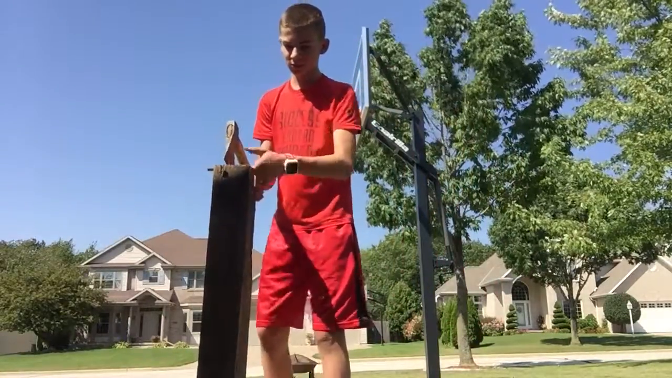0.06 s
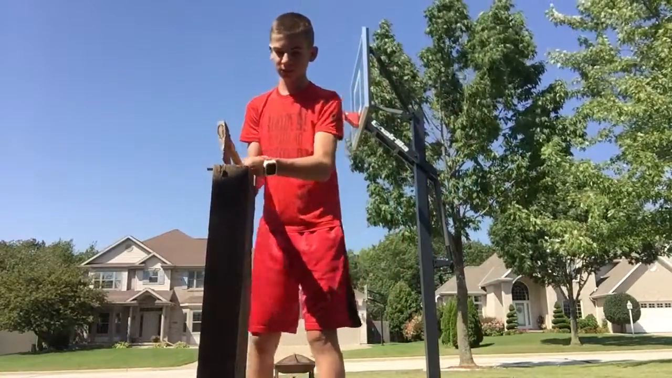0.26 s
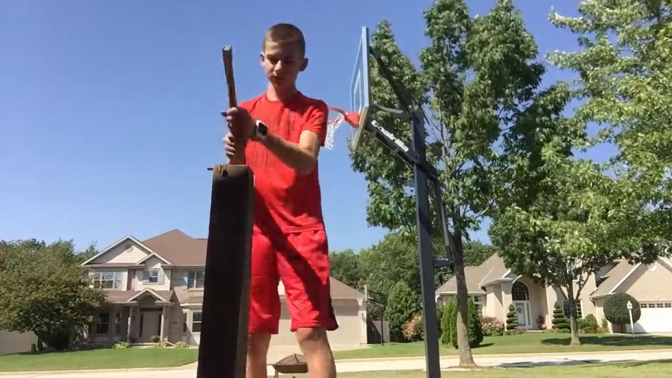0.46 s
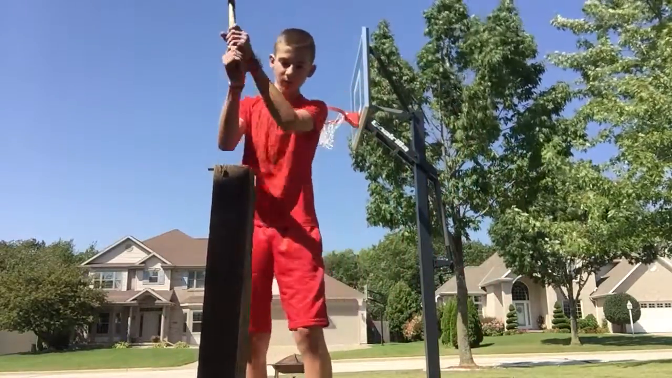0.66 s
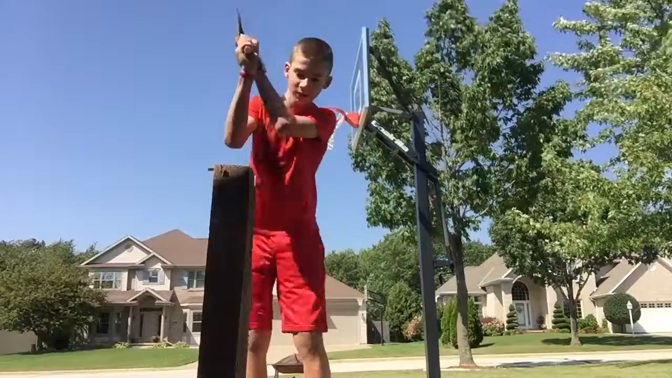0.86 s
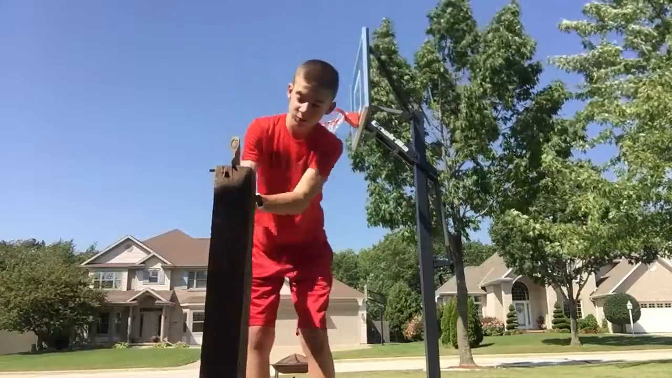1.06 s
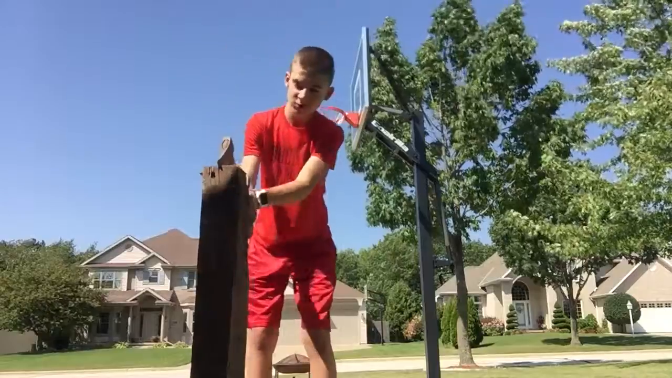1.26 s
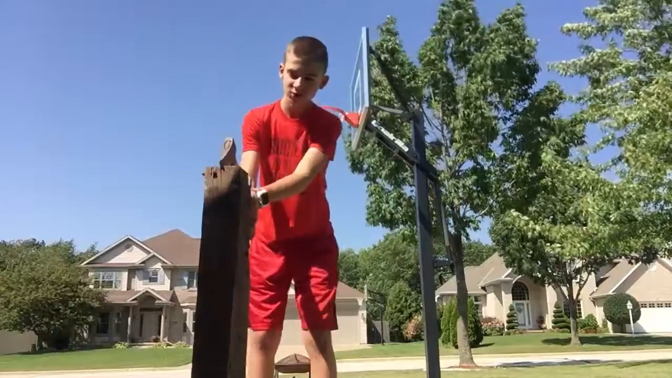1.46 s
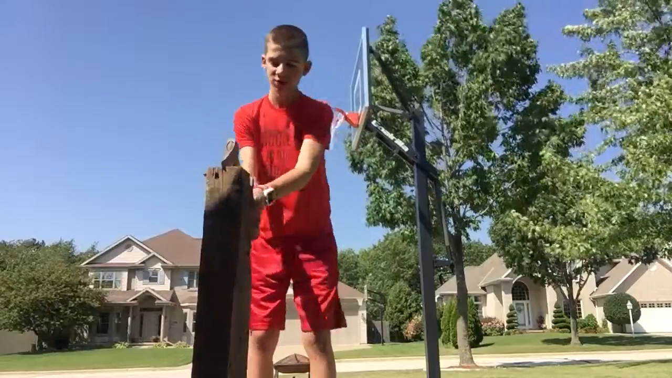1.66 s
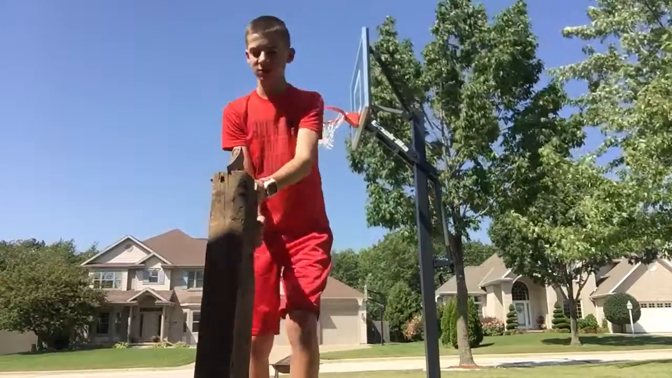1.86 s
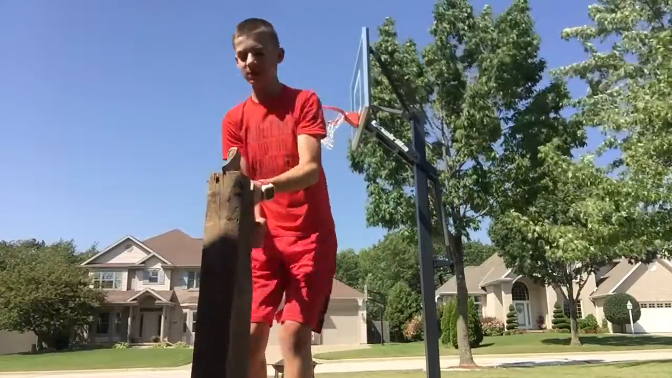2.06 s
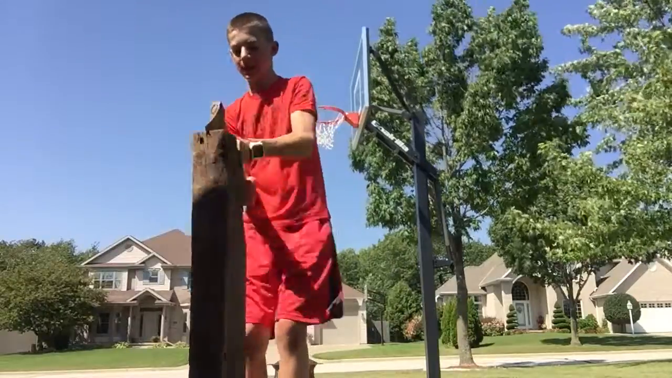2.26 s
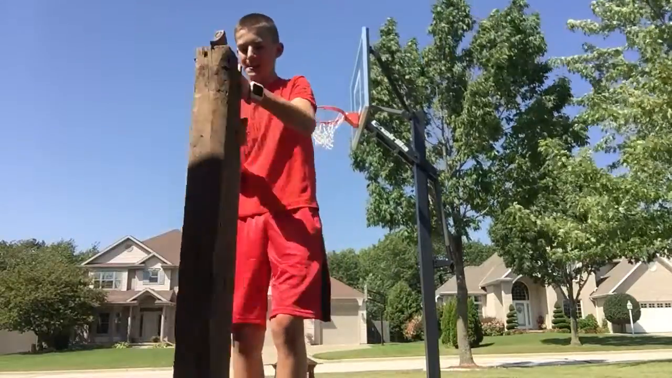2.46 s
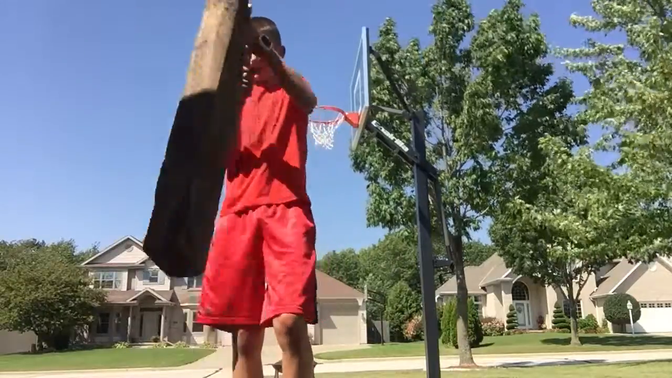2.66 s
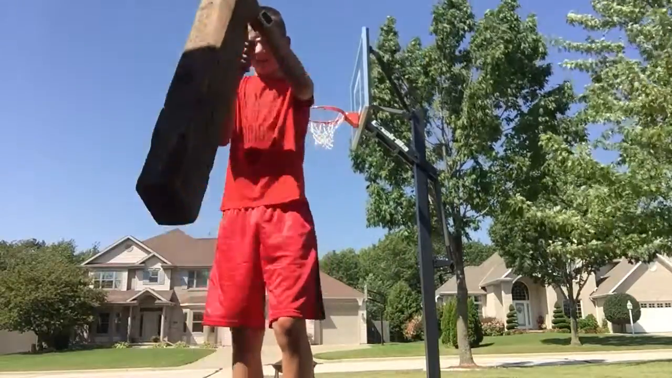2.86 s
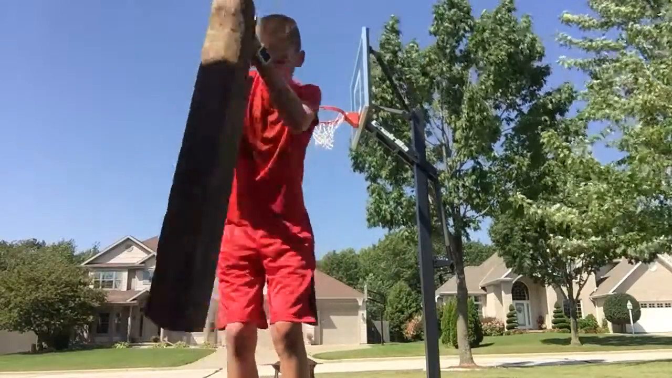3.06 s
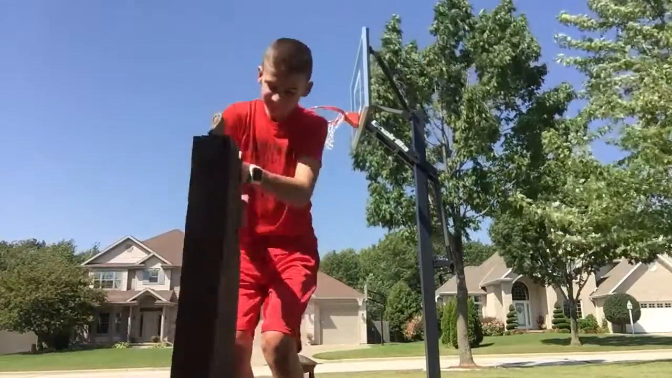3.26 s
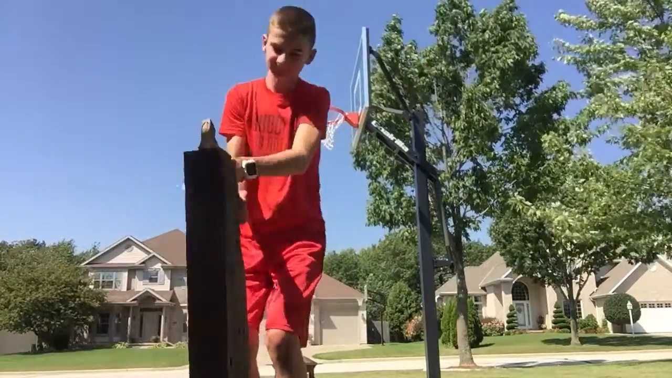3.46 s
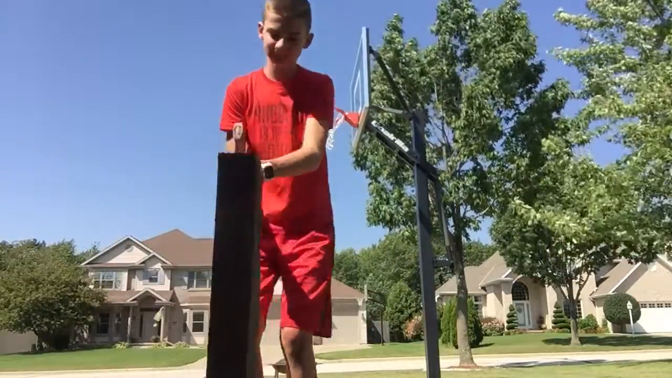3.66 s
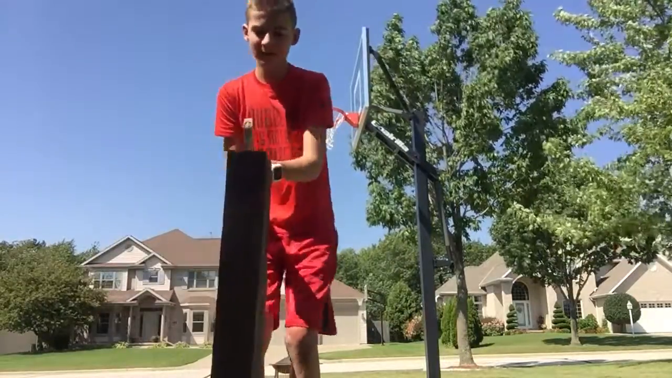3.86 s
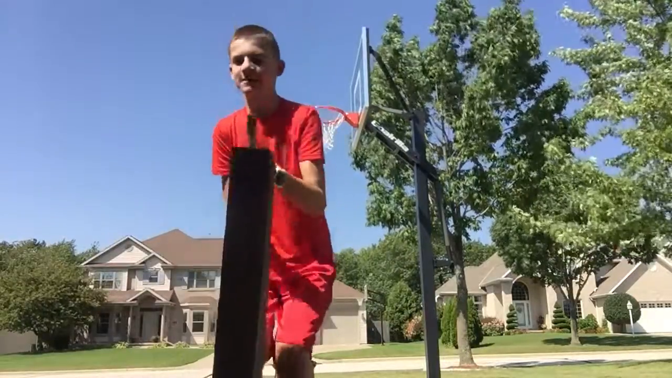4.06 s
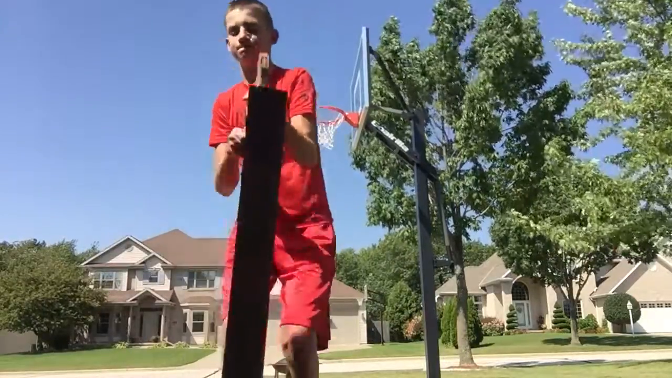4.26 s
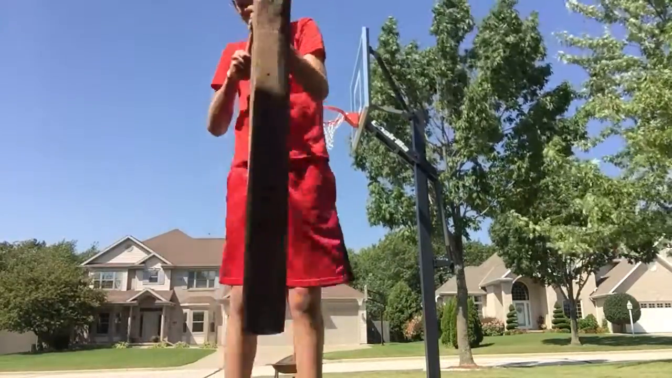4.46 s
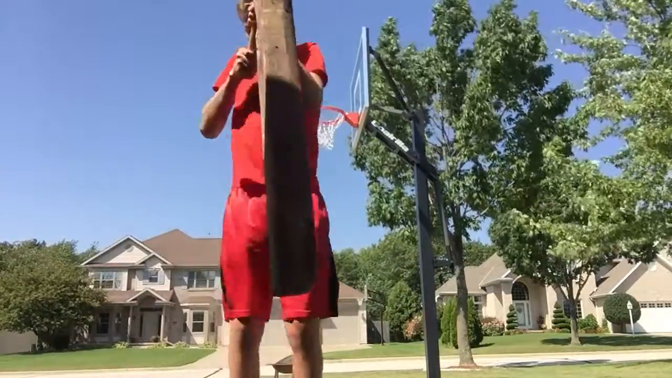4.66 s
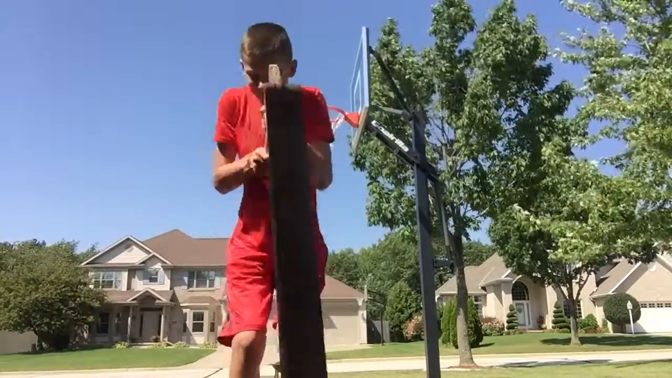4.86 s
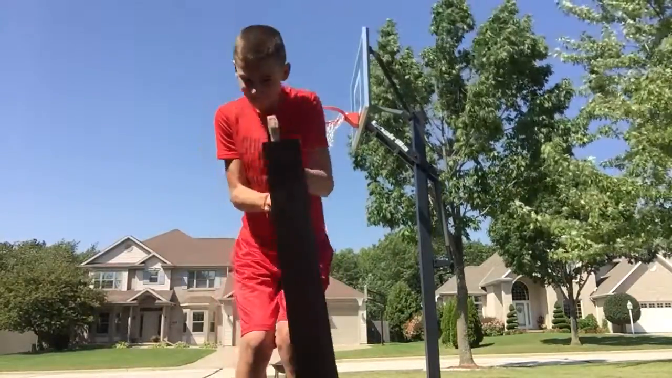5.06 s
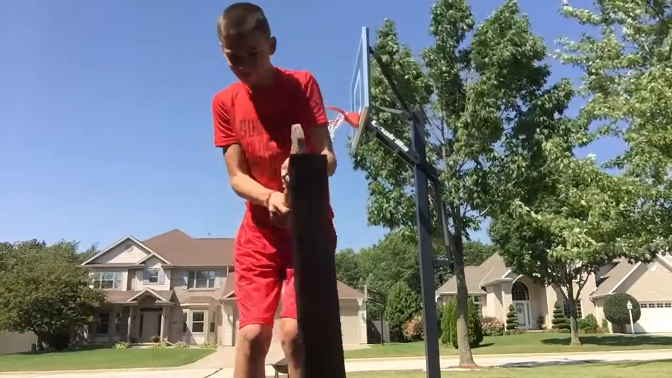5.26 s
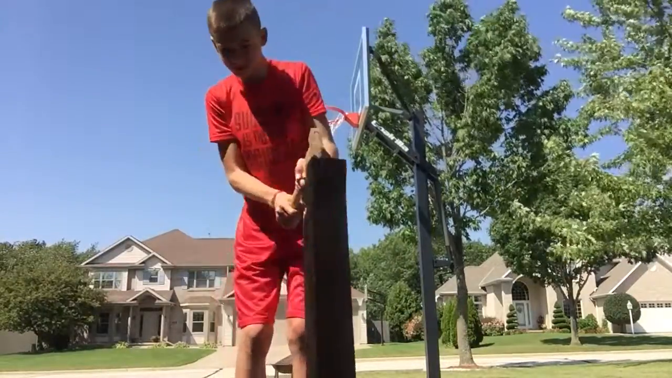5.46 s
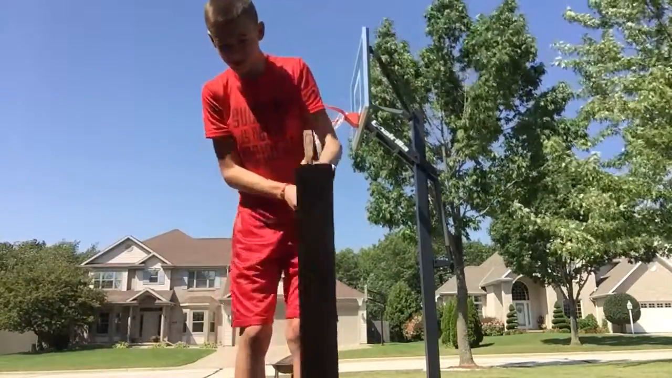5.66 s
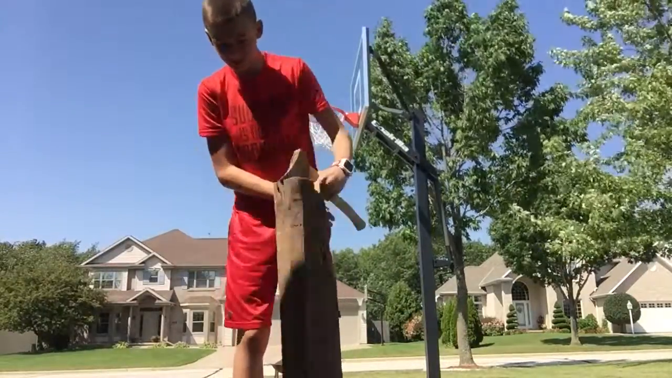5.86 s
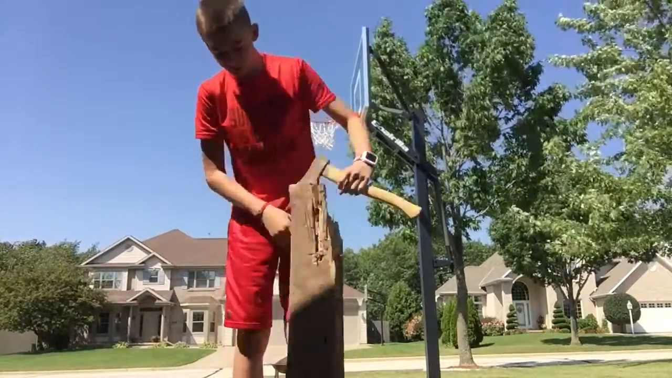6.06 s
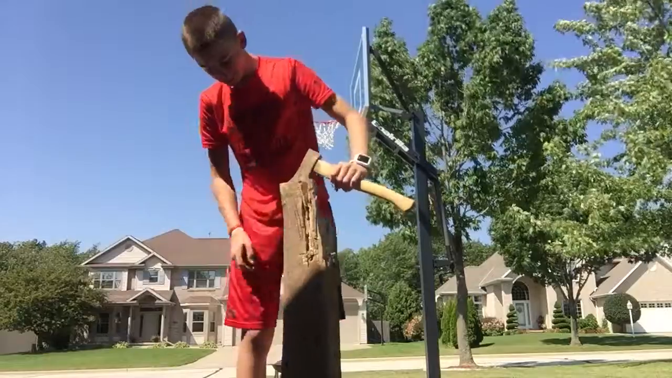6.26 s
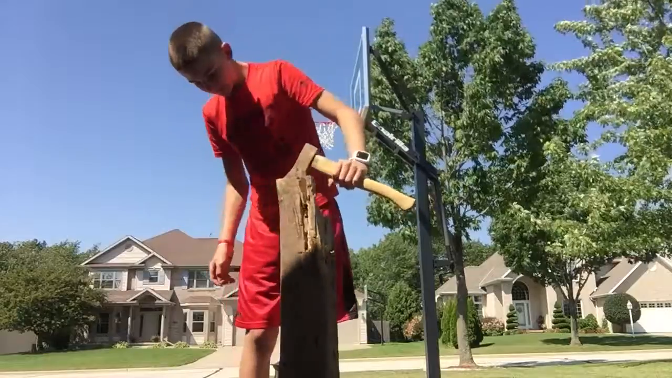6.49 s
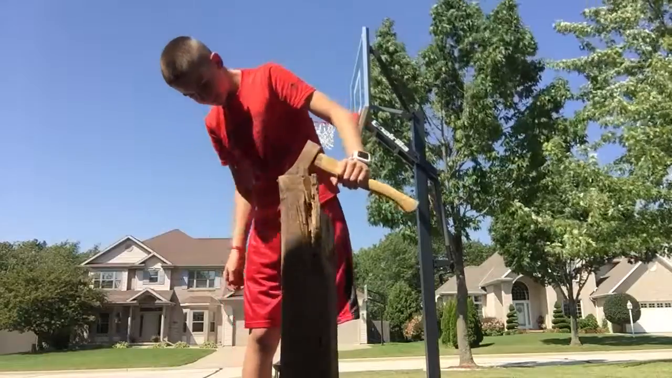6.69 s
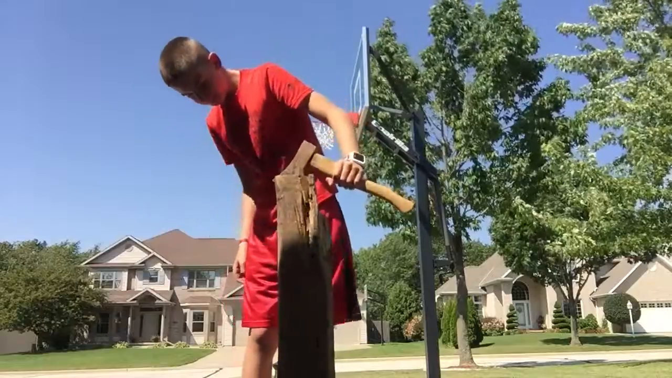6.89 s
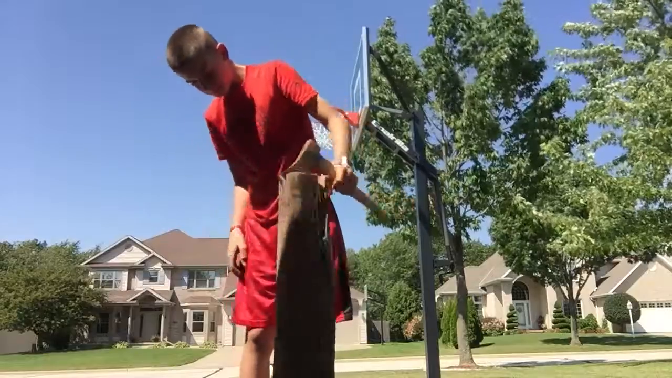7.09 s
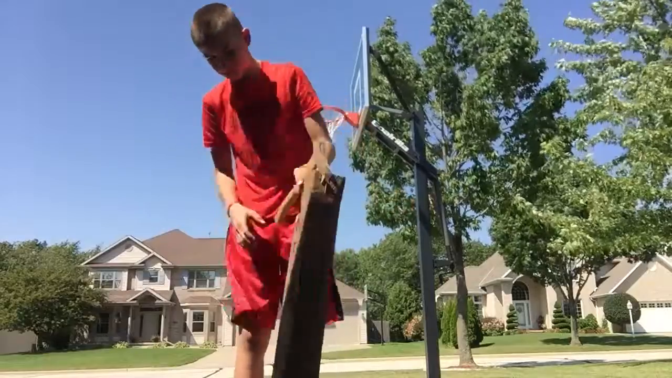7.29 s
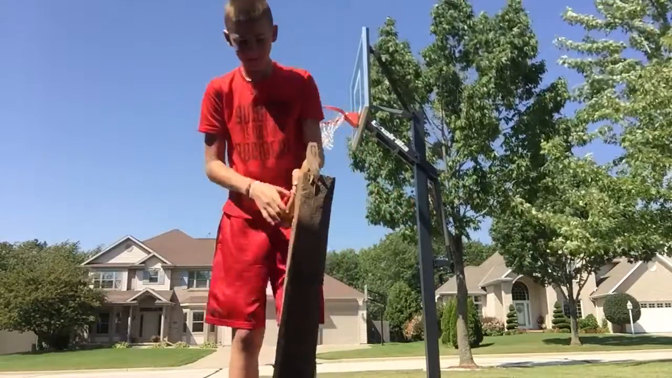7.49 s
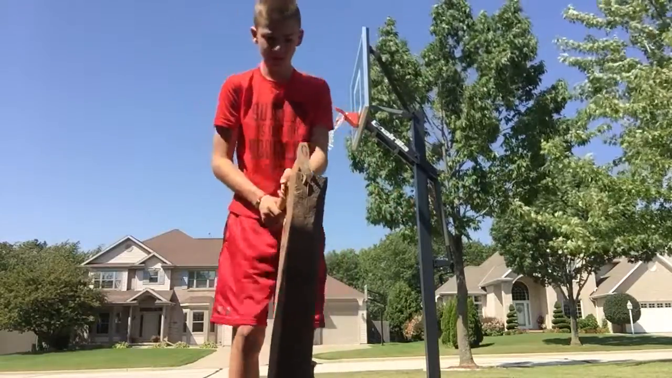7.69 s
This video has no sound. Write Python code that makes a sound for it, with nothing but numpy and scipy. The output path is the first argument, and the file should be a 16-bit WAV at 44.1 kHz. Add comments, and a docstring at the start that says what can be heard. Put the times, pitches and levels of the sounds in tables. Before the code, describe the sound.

A quiet open yard: soft leaf hiss, low rumble, far road hum and thin, fluttering insect trills, mostly in the first two seconds. Faint handling, then cloth rustles around 0.7 s. At 1.1 s a hatchet chops hard into a wooden post, bright and crunchy with a short low thud and an echo from paving and house walls. Breeze bumps the microphone at 1.6-2.0 and 2.6-3.2 s, with tiny fibre cracks near 2.0 and 2.2. At 3.3 s the post slams down, very loud, dull and overloaded; a hollow bounce follows at 3.55, then weaker knocks to 3.8. A snap at 3.95, hand rubs around 4.6. A second massive slam at 5.0 bounces at 5.25 and 5.4. Creaking and gritty rubbing at 5.6, a double light clack near 5.85, a small creak at 6.05. A faint distant whine swells around 6.2; sparse ticks and soft rubs close by 7.7 s.

```python
"""Hatchet and post in a yard

Close at the microphone, a hatchet is driven into a wooden post, which is lifted on the blade, slammed down
twice and bounces: crushed fibres and ringing modes over a thud of its foot. Fibres crack as random snaps,
hands rub as dragged grit, the blade creaks as an uneven tone. Paving and house walls answer by convolution.
Farther off a road hums, leaves rustle, insects trill and a faint whine swells, as shaped noise and tones.
A breeze puffs on the microphone, which overloads and turns its gain down on the slams."""
import sys
import numpy as np
from scipy import signal
from scipy.fft import rfft, irfft, next_fast_len
from scipy.io import wavfile
from scipy.ndimage import minimum_filter1d, map_coordinates

SR = 44100
rng = np.random.default_rng(int(sys.argv[2]) if len(sys.argv) > 2 else 0)


def dump(signal):
    """Clip the signal to [-1, 1] and save it as 16-bit WAV at the path in sys.argv[1]."""
    limited = np.clip(np.atleast_2d(signal).T, -1, 1)
    pcm = np.round(limited * 32767).astype(np.int16)
    wavfile.write(sys.argv[1], SR, pcm)


N = 340893

# The chop, the slams, their bounces and two rattles of the loose blade. Each row: start in seconds, # blow
# level in dB, brightness in Hz, hollowness as a Q, crack level in dB, thud level in dB, # thud lag in seconds.
BLOW_EVENTS = [(1.135, -2.5, 1300, 0.78, -13, -4.5, .012), (3.3146, 12, 613, 0.67, -16, 12, .0018),
               (3.5464, 4.5, 746, 2.25, -23.5, 0.5, 0.0046), (3.649, -13, 463, 1.3, -45, -6.5, 0.0026),
               (3.778, -27.5, 450, 1.0, -70, -24, 0.0024), (5.012, -21, 800, 1.2, -47.5, -23, 0.0007),
               (5.0252, 11.5, 475, 0.88, -15.5, 12.5, 0.0034), (5.239, -0.5, 477, 0.82, -29, 1.5, 0.0012),
               (5.3807, -9, 440, 0.89, -33, -5.5, 0.0015), (5.4425, -30.5, 388, 0.76, -42.5, -14.5, 0.001),
               (5.475, -44, 522, 1.0, -40.5, -26, 0.0016), (5.837, -15.5, 1200, 2.6, -25, -24, 0.0018),
               (5.869, -19, 1200, 1.5, -32, -25, 0.0031), (5.891, -39, 450, 1.0, -60, -20.5, 0.0012)]
# Ringing modes of the post. Each row: frequency in Hz, relative level in dB, t60 in seconds.
POST_MODES = [(348, -2.5, 0.16), (458, -1.5, 0.089), (537.4, -5, 0.15), (584, 1, 0.12), (670, -1.5, 0.11),
              (758, -1, 0.049), (884, 3, 0.048), (1089, -2.5, .09), (1154, -12.5, .06), (1206, -5, .08),
              (1550, -3, 0.082), (1685, -3, 0.05), (1750, -15.5, .07), (2096, -0.5, 0.083),
              (2110, -5, 0.076), (2600, -13.5, .05), (2897, -23.5, .08), (3312, -10.5, 0.096),
              (3815, -23, 0.045), (4130, -25, 0.15)]
# The post's foot against the ground. Each row: frequency in Hz, relative level in dB, t60 in seconds.
FOOT_MODES = [(57.5, -15, 0.068), (81, -7, 0.067), (131.3, -6, 0.084), (189.5, -3.5, 0.054),
              (244, -0.5, 0.061), (325, -13, 0.076), (378, -13, 0.1)]
# Fibres tearing and the blade slipping in the split.
# Each row: start in seconds, level in dB, length in seconds, brightness in Hz.
CRACK_EVENTS = [(0.541, -51, 0.017, 8000), (2.0234, -41, 0.0091, 3050), (2.033, -47.5, 0.02, 2180),
                (2.244, -38, 0.019, 2700), (2.251, -42.5, 0.022, 1360), (3.28, -44, 0.02, 2530),
                (3.289, -36.5, 0.024, 453), (3.946, -28.5, 0.0036, 8950), (4.486, -45.5, 0.0035, 2660),
                (4.502, -39.5, 0.015, 3680), (5, -43, 0.0075, 1186), (5.544, -41, 0.0051, 5000),
                (5.586, -37.5, 0.017, 3440), (5.63, -40.5, 0.0013, 8000), (5.8342, -30.5, 0.0091, 5200),
                (5.866, -33, 0.0071, 6730), (6.79, -40.5, 0.0058, 2630), (7.115, -44.5, 0.0042, 4040),
                (7.3115, -43, 0.0068, 2590), (7.3906, -38.5, 0.0017, 7530), (7.562, -49.5, 0.0057, 8950)]
# The tight blade creaking in the wood. Each row: start in seconds, level in dB, length in seconds, pitch in Hz.
CREAK_EVENTS = [(0.298, -50.5, 0.041, 373), (5.586, -46, 0.068, 600), (5.619, -33.5, 0.035, 616),
                (5.654, -41.5, 0.035, 620), (6.051, -41.5, 0.039, 620), (7.612, -47.5, 0.059, 380)]
# Breeze on the microphone. Each row: start in seconds, level in dB before a small trim, length in seconds.
PUFF_EVENTS = [(1.625, -40, 0.028), (1.659, -35, 0.028), (1.76, -32.5, 0.038), (1.792, -25.5, 0.088),
               (1.99, -33.5, 0.049), (2.64, -41, 0.033), (2.871, -40, 0.025), (2.936, -34, 0.066),
               (3.026, -31.5, 0.12), (3.166, -32, 0.093)]
# Colour of the leaves. Each row: frequency in Hz, relative level in dB.
LEAVES_SPECTRUM = [(300, -25.5), (700, -14.5), (1400, -0.5), (1950, 0), (2700, -0.5), (3700, -2),
                   (5000, -8), (7100, -11.5), (8500, -18), (10500, -25.5), (16000, -36)]
# Colour of the low rumble. Each row: frequency in Hz, relative level in dB.
RUMBLE_SPECTRUM = [(15, -32.5), (28, -24.5), (50, -1), (80, -0.5), (147, -1.5), (200, -4.5), (260, -9.5),
                   (350, -9), (420, -32.5), (600, -28), (1300, -67)]
# How long the house walls hold each pitch. Each row: frequency in Hz, t60 in seconds.
WALL_DECAY = [(80, 0.46), (300, 0.66), (700, 0.7), (2000, 0.6), (6000, 0.61), (14000, 0.29)]
# Colour of the walls' answer. Each row: frequency in Hz, relative level in dB.
ECHO_SPECTRUM = [(60, -4), (160, -1.5), (250, -0.5), (340, 6.5), (430, 0), (560, -4.5), (900, -4),
                 (1600, -2), (2500, -3.5), (4500, -2), (15000, -9)]
# Colour of the far road. Each row: frequency in Hz, relative level in dB.
ROAD_SPECTRUM = [(250, -20), (420, -2), (650, 1), (870, 2.5), (1200, -1), (1800, -33.5), (4000, -25)]
# Strokes of hands and blade over the wood.
# Each row: time of the peak in seconds, level in dB, length in seconds, brightness in Hz.
RUB_STROKES = [(0.294, -61, .08, 12000), (0.643, -59, 0.12, 8000), (4.522, -47.5, 0.069, 5000),
               (4.61, -45.5, 0.055, 3700), (4.681, -56.5, 0.11, 750), (5.558, -44, 0.082, 1500),
               (5.616, -46, .12, 5300), (5.938, -52, 0.076, 6000), (6.046, -45.5, 0.084, 3900),
               (7.15, -54.5, 0.13, 7500), (7.344, -50.5, 0.13, 2000), (7.64, -58.5, 0.088, 382)]
# Course of the low rumble. Each row: time in seconds, level in dB.
RUMBLE_COURSE = [(0, -56), (.6, -55), (1.15, -48), (2.5, -52.5), (3.75, -44.5), (4.2, -51.5), (5.5, -45.5),
                 (6.5, -52.5), (7.73, -46.5)]
# The insects' trills. Each row: start in seconds, length in seconds, level in dB, pitch in Hz.
TRILL_EVENTS = [(-.05, 0.33, -59, 4240), (.3, .52, -62, 4180), (0.776, 0.33, -57, 4200),
                (1.26, 0.11, -59, 4240), (1.49, .78, -60, 4310), (7.001, 0.16, -63.5, 4840)]
# Course of the far road. Each row: time in seconds, level in dB.
ROAD_COURSE = [(0, -60.5), (1, -57), (2.4, -57), (5.6, -59), (6.6, -63.5), (7.73, -59)]

TRILL_EDGE_S = 0.043  # attack and release of a trill
LEAVES_DB, LEAVES_DB_PER_S = -52.5, -0.5  # the leaves slowly settle
RUB_EDGE_DB, RUB_RISE = 12.5, 0.55  # fade at a stroke's ends; share of its length before the peak
SNAGS_PER_S, SNAG_DB, RUB_KNOCK_DB = 150, -2, 0  # splinters that catch; the post's answer
SWING_S, SWING_LENGTH_S, SWING_DB = 0.714, 0.14, -50  # peak, half length, level
SHARP_RISE_S, SOFT_RISE_S, SHARP_CRACK_DB = 0.00042, 0.0023, -14  # less crack, longer contact
RING_DB, RING_LOSS, RING_MAX_DB = -6.5, 0.45, -7.5  # ring re blow; loss in dB for each dB of force
WHINE_S, WHINE_LENGTH_S, WHINE_DB, WHINE_HZ = 6.2, 0.31, -58.5, 1980  # peak, half length, level, pitch
TOP_HZ = 15850  # upper band limit of the microphone chain


def amp(db):
    """Decibels to gain."""
    return 10 ** (np.asarray(db) / 20)


def unit(x):
    """Scale to rms 1."""
    return x / np.sqrt(np.mean(x ** 2) + 1e-20)


def along(points, hz):
    """(Hz, value) points read on a log frequency axis."""
    f, v = np.transpose(points)
    return np.interp(np.log(hz + 1), np.log(f + 1), v)


def course(rows):
    """(seconds, value) points read at every sample."""
    s, value = np.transpose(rows)
    return np.interp(np.arange(N) / SR, s, value)


def wobble(rate):
    """A smooth random curve, rate knots a second."""
    knots = rng.standard_normal(int(N * rate / SR) + 4)
    return map_coordinates(knots, [np.arange(N) * rate / SR])


def filtered(x, response):
    """x times a response of frequency."""
    m = next_fast_len(len(x) + SR // 4)
    spectrum = rfft(x, m) * response(np.fft.rfftfreq(m, 1 / SR))
    return irfft(spectrum, m)[:len(x)]


def coloured(x, response):
    """x through a response, keeping its energy."""
    y = filtered(x, response)
    return y * np.linalg.norm(x) / np.linalg.norm(y)


def noise(response, size):
    """Coloured noise of rms 1."""
    return unit(filtered(rng.standard_normal(size), response))


def band(hz, centre_hz, q):
    """A causal resonance with gain 1 at its centre."""
    damping = 1j * hz * centre_hz / q
    return damping / (centre_hz ** 2 - hz ** 2 + damping)


def add(track, s, sound):
    """Mix a sound into the track at time s."""
    part = track[max(0, round(s * SR)):][:len(sound)]
    part += sound[:len(part)]


def swell(length):
    """A rounded rise and fall."""
    return np.sin(np.linspace(0, np.pi, max(8, int(length * SR))))


def bump(peak_s, half_length_s):
    """A bell-shaped swell over the whole track."""
    return np.exp(-((np.arange(N) / SR - peak_s) / half_length_s) ** 2)


def ring(modes, t, weight, scatter_db):
    """Damped modes of alternating sign, at freshly scattered strengths."""
    hz, db, t60 = np.transpose(modes)
    sign = (-1) ** np.arange(len(hz))
    gain = amp(db + scatter_db * rng.standard_normal(len(hz))) * weight(hz) * sign
    tones = np.sin(2 * np.pi * np.outer(hz, t)) * amp(-60 * t / t60[:, None])
    return gain / np.linalg.norm(gain) @ tones


def fibres(size, rate, spread_db):
    """Tiny snaps of unequal size, rate a second, rms 1."""
    snaps = (rng.random(size) < rate / SR) * rng.standard_normal(size)
    return unit(snaps * amp(spread_db * rng.standard_normal(size)))


def gripped(x):
    """The post's answer to x, damped by the hands that hold it."""
    t = np.arange(SR // 8) / SR
    grip = amp(-60 * t / 0.022)
    body = ring(POST_MODES, t, np.ones_like, scatter_db=4.5) * grip
    return signal.fftconvolve(x, body / np.linalg.norm(body))[:len(x)]


def insects():
    """Each trill holds one thin, fluttering pitch."""
    out, t = np.zeros(N), np.arange(N) / SR
    for s, length, db, pitch_hz in TRILL_EVENTS:
        gate = np.clip(np.minimum(t - s, s + length - t) / TRILL_EDGE_S, 0, 1)
        turns = np.cumsum(pitch_hz + 25 * wobble(160)) / SR
        out += amp(db) * gate * np.sin(2 * np.pi * turns)
    return out * amp(3.7 * wobble(30.25))


def yard():
    """Low rumble, a distant road and rustling leaves, each a coloured noise of wavering level."""
    def rush(spectrum):
        """Noise with the colour of a table."""
        return noise(lambda hz: amp(along(spectrum, hz)), N)

    leaves_db = LEAVES_DB + LEAVES_DB_PER_S * np.arange(N) / SR
    rumble = amp(course(RUMBLE_COURSE) + 3.7 * wobble(22)) * rush(RUMBLE_SPECTRUM)
    road = amp(course(ROAD_COURSE) + 1.2 * wobble(14)) * rush(ROAD_SPECTRUM)
    leaves = amp(leaves_db + 0.7 * wobble(20)) * rush(LEAVES_SPECTRUM)
    return rumble + road + leaves


def rubs():
    """Each stroke swells and fades; it drags over fine grit and catches on a few splinters."""
    out, t = np.zeros(N), np.arange(-SR // 4, SR // 4) / SR
    for s, db, length, bright_hz in RUB_STROKES:
        from_peak = np.maximum(-t / RUB_RISE, t / (1 - RUB_RISE)) / length
        pressure = amp(-RUB_EDGE_DB * from_peak)
        grit = fibres(len(t), rate=1400, spread_db=1.0)
        snags = fibres(len(t), rate=SNAGS_PER_S, spread_db=4.5)
        drag = filtered(grit + amp(SNAG_DB) * snags, lambda hz: band(hz, bright_hz, q=0.55))
        scrape = pressure * unit(drag)
        add(out, s + t[0], amp(db) * (scrape + amp(RUB_KNOCK_DB) * gripped(scrape)))
    return out


def creaks():
    """The blade sticks and slips at an uneven rate: a jittered tone and its octave."""
    out = np.zeros(N)
    for s, db, length, pitch_hz in CREAK_EVENTS:
        shape = swell(length)
        jitter = 0.044 * noise(lambda hz: hz < 200, len(shape))
        turns = np.cumsum(pitch_hz * (1 + jitter)) / SR
        tone = np.sin(2 * np.pi * turns) + 0.37 * np.sin(4 * np.pi * turns)
        add(out, s, amp(db) * shape * tone)
    return out


def paving(x):
    """Quick, sparse reflections of x from the paving nearby."""
    t = np.arange(SR // 12) / SR
    early = fibres(len(t), rate=2900, spread_db=4.0) * (t > 0.007) * amp(-60 * t / 0.079)
    return amp(-13) * signal.fftconvolve(x, early / np.linalg.norm(early))[:N]


def echo():
    """A slap from a house front inside a diffuse tail that decays at its own rate for each pitch."""
    hz, t, z = signal.stft(rng.standard_normal(SR * 3 // 4), SR, nperseg=256)
    tail_db = along(ECHO_SPECTRUM, hz)[:, None] - 60 * t / along(WALL_DECAY, hz)[:, None]
    tail = signal.istft(z * amp(tail_db), SR, nperseg=256)[1]
    t = np.arange(len(tail)) / SR
    slap = np.exp(-((t - 0.057) / 0.026) ** 2)
    tail = tail * (1 - np.exp(-t / 0.007)) * amp(2.6 * slap)
    return tail / np.linalg.norm(tail)


def houses(handling, count):
    """The post radiates differently towards each house, so their echoes blend into a smooth wash."""
    echoes = sum(signal.fftconvolve(blows() + handling, echo())[:N] for _ in range(count))
    return amp(-19.5) * echoes / np.sqrt(count)


def cracks():
    """Short runs of snapping fibres; the gripped post rings only briefly."""
    out, t = np.zeros(N), np.arange(SR // 8) / SR
    for s, db, length, bright_hz in CRACK_EVENTS:
        colour = lambda hz: band(hz, bright_hz, q=0.67) / (1 + 1j * hz / (1.5 * bright_hz))
        snaps = unit(filtered(fibres(len(t), rate=6300, spread_db=2.5), colour))
        onset = 1 - np.exp(-t / (0.061 * length))
        release = np.exp(-np.maximum(t - length, 0) / 0.0013)
        run = snaps * onset * release
        add(out, s, amp(db) * (run + amp(-4.0) * gripped(run)))
    return out


def swing():
    """Shirt and sleeves rustle as the hatchet goes up: one swell of flickering noise."""
    cloth = noise(lambda hz: band(hz, 1450, q=1.0) / (1 + 1j * hz / 6000), N)
    return amp(SWING_DB + 4 * wobble(41.5)) * bump(SWING_S, SWING_LENGTH_S) * cloth


def burst(t, t60):
    """A dying run of crushing fibres, evened out so that no pitch stands out in it."""
    shape = amp(-60 * t / t60)
    x = rng.standard_normal(len(t)) * shape
    for _ in range(3):  # flatten the spectrum, then restore the decay
        z = rfft(x)
        x = irfft(z / (abs(z) + 1e-9), len(t)) * np.minimum(1, 4 * shape)
    return x * np.linalg.norm(shape) / np.linalg.norm(x)


def blows():
    """Each blow crunches and rings the post, and its foot thuds on the ground."""
    out, t = np.zeros(N), np.arange(SR // 7) / SR
    for s, db, bright_hz, hollow, crack_db, thud_db, lag in BLOW_EVENTS:
        rise = np.minimum(SHARP_RISE_S * amp(SHARP_CRACK_DB - crack_db), SOFT_RISE_S)
        # a harder blow crushes more and rings less
        ring_db = np.minimum(RING_DB - RING_LOSS * db, RING_MAX_DB)
        # a softer contact excites only the lower modes
        contact = lambda hz: band(hz, bright_hz, q=hollow) / (1 + 1j * hz / (1.98 * bright_hz))
        modes = ring(POST_MODES, t, lambda hz: abs(contact(hz)), scatter_db=1.54)
        crush = coloured(burst(t, t60=0.033), contact)
        wood = (amp(ring_db) * modes + amp(-3.0) * crush) * (1 - np.exp(-t / rise))
        splinters = amp(3.5) * burst(t, t60=0.021) + amp(-17) * burst(t, t60=0.15)
        crack = coloured(splinters, lambda hz: band(hz, 2100, q=0.65) / (1 + 1j * hz / 15000))
        add(out, s, amp(db) * wood + amp(crack_db) * crack)
        thud = ring(FOOT_MODES, t, np.ones_like, scatter_db=1.5) * (1 - np.exp(-t / 0.0017))
        add(out, s + lag, amp(thud_db) * thud)
    return out


def puffs():
    """Small eddies bump the microphone port: short swells of low noise."""
    out = np.zeros(N)
    eddy = lambda hz: band(hz, 91.6, q=1.22) / (1 + (hz / 240) ** 6)  # dark above a few hundred Hz
    for s, db, length in PUFF_EVENTS:
        shape = swell(length)
        gust = unit(shape * noise(eddy, SR // 4)[:len(shape)])
        add(out, s, amp(db - 0.5) * gust)
    return out


def whine():
    """A faint, fuzzy whine swells once in the distance: narrow-band noise."""
    tone = noise(lambda hz: band(hz, WHINE_HZ, q=7.4) ** 2, N)
    return amp(WHINE_DB) * bump(WHINE_S, WHINE_LENGTH_S) * tone


def scene():
    """The wood and its echoes in the open yard."""
    handling = cracks() + rubs() + creaks()
    wood = blows() + handling
    answers = paving(wood) + houses(handling, count=4)
    surroundings = yard() + insects() + whine()
    return (wood + answers + swing() + puffs() + surroundings)[None]


def lagged(x, seconds):
    """A one-pole smoother."""
    k = np.exp(-1 / (seconds * SR))
    return signal.lfilter([1 - k], [1, -k], x)


def gain_control(x, threshold_db, depth_db, hold, release_db):
    """Loud sound pulls the gain down; it waits hold seconds, then recovers at release_db a second."""
    level_db = 10 * np.log10(lagged(x ** 2, 0.014) + 1e-12)
    over = np.clip(level_db - threshold_db, 0, depth_db)
    half = int(hold * SR / 2)
    # largest excess over the past hold time
    held = -minimum_filter1d(-over, 2 * half + 1, origin=half, mode="constant")
    ramp = release_db * np.arange(N) / SR
    cut_db = np.maximum.accumulate(held + ramp) - ramp
    return x * amp(-lagged(cut_db, 0.026))


def record(dry):
    """The microphone chain: gain control, rounded overload and the band limit."""
    x = gain_control(dry[0], threshold_db=-11, depth_db=7, hold=0.36, release_db=30)
    x = x / (1 + np.abs(x / 0.98) ** 6) ** (1 / 6)
    return filtered(x, lambda hz: 1 / (1 + (hz / TOP_HZ) ** 120))[None]


dry = scene()
out = record(dry)
dump(out)
```